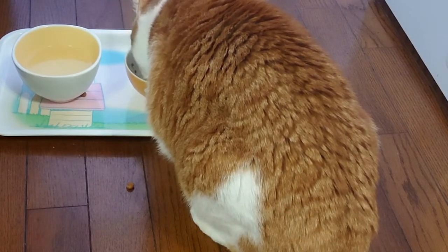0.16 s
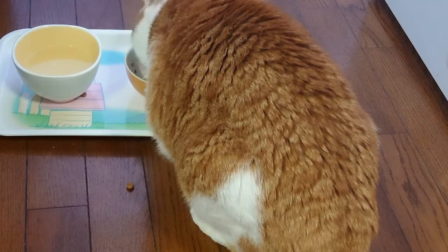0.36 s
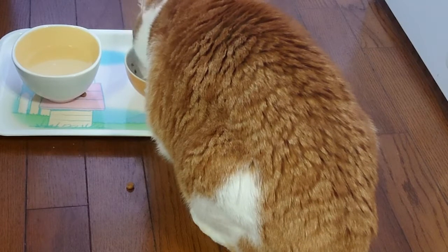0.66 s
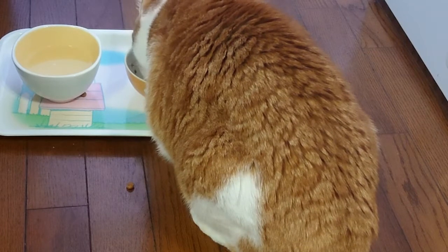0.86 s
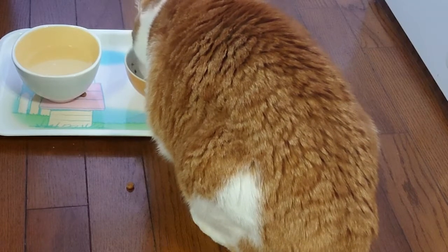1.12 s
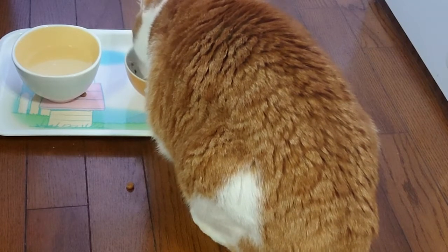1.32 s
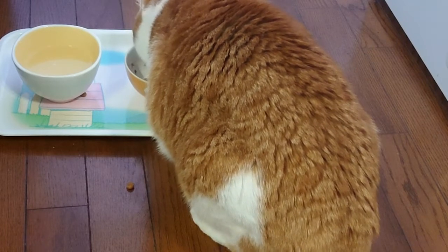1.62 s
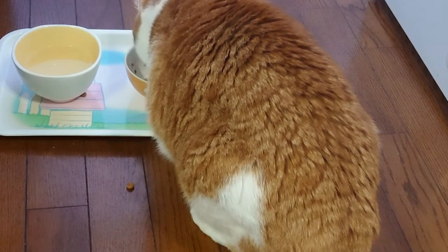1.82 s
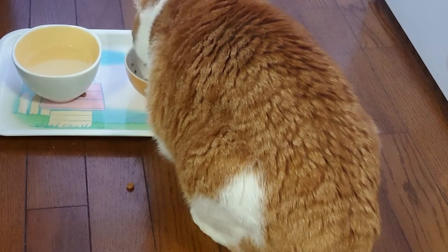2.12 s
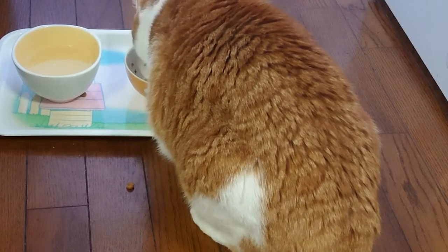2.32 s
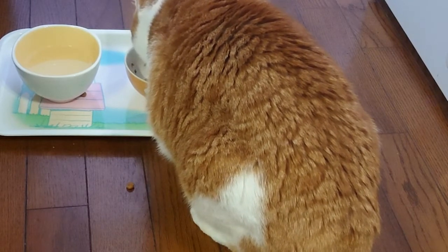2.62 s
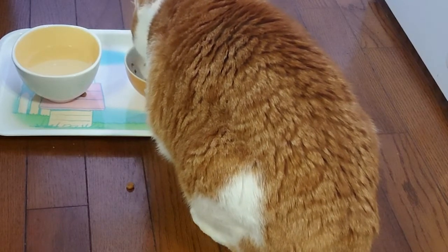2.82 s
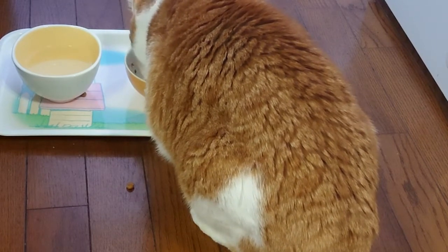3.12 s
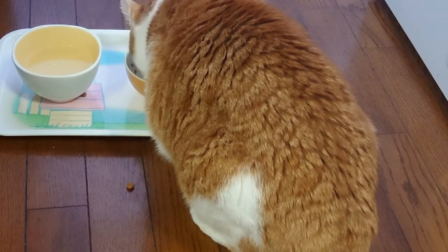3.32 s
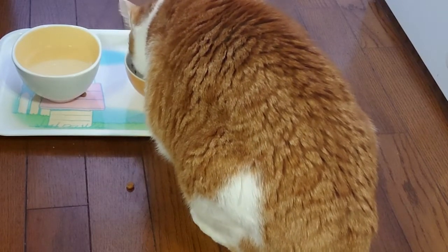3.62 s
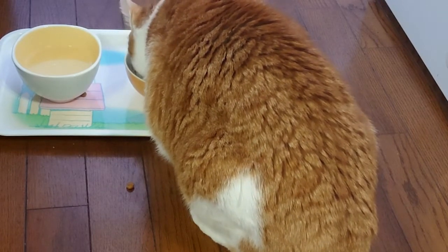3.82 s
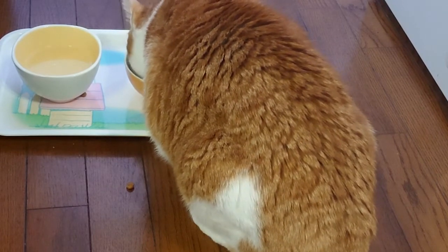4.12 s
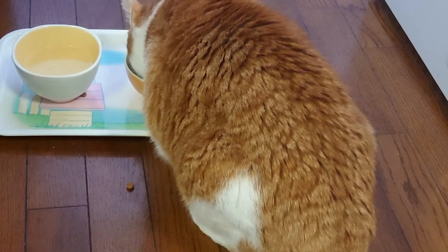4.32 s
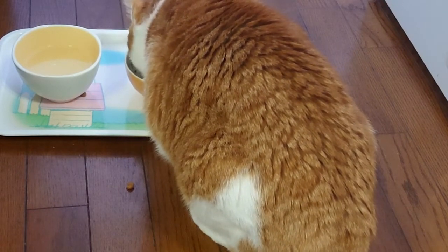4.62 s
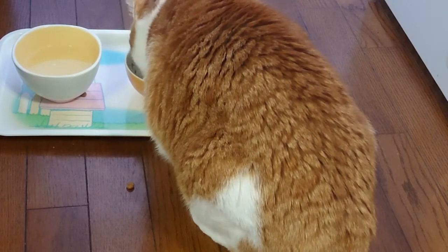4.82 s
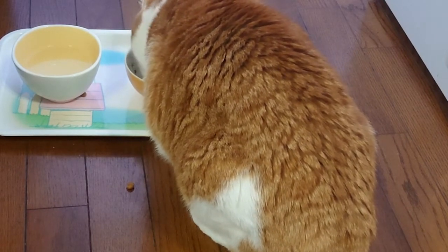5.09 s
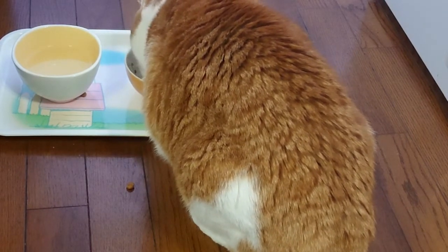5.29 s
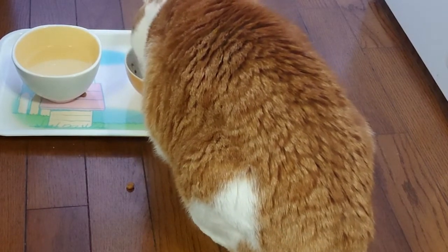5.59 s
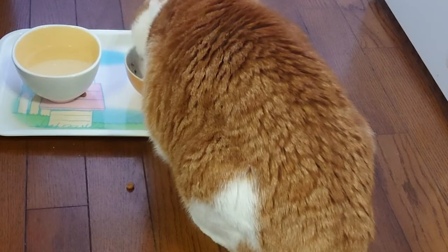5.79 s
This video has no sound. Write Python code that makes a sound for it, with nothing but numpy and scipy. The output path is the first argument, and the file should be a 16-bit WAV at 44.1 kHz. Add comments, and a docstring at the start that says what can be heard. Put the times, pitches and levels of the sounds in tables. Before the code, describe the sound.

A cat eats wet food from a bowl with smacks and soft bumps, until a door thuds shut across the room.

```python
"""A bare room with a wooden floor, where a cat eats wet minced food from a small bowl on a tray.
Wet films tear in its mouth as smacks and crackles; its tongue rubs the bowl and its muzzle bumps it.
Something like a door thuds shut nearby, with a latch click and a booming panel. The cat pauses and gives
one soft lick, while a scrape and a few hollow knocks come from across the room, over still air and hum."""
import sys
import numpy as np
from scipy import signal
from scipy.fft import rfft, irfft
from scipy.io import wavfile

SR = 44100
rng = np.random.default_rng(int(sys.argv[2]) if len(sys.argv) > 2 else 0)


def put_to_file(sound):
    """Save the sound as 16-bit audio at rate SR, in the file named by the first command-line argument."""
    columns = np.atleast_2d(sound).T  # one column per channel
    safe = np.clip(columns, -1, 1)
    whole_steps = np.round(safe * 32767)
    wavfile.write(sys.argv[1], SR, whole_steps.astype(np.int16))


N = 262395
TIME = np.arange(N) / SR

# tone of a wet pop inside the mouth: (frequency [Hz], level [dB])
MOUTH_SPECTRUM = [(150, -21), (700, -6), (1100, 2), (1550, 2.5), (1850, 3), (2700, 0.5), (3500, -3.5),
                  (5500, -16.5), (9000, -60)]
# bright snap of a tearing wet film: (frequency [Hz], level [dB])
SNAP_SPECTRUM = [(500, -33), (2400, -3.5), (3500, 2.5), (5000, -3.5), (6200, -7.5), (8000, -29),
                 (12000, -59.5)]


def from_db(db):
    """Decibels to amplitude."""
    return 10 ** (np.asarray(db) / 20)


def unit_energy(x):
    """Scale each channel to an energy of 1."""
    return x / np.sqrt(np.sum(x ** 2, axis=-1, keepdims=True) + 1e-20)


def unit_rms(x):
    """Scale each channel to an RMS of 1."""
    return unit_energy(x) * np.sqrt(x.shape[-1])


def at_hz(points, hz):
    """Read a table on a log-frequency axis."""
    knots, values = np.transpose(points)
    return np.interp(np.log(np.maximum(hz, 1)), np.log(knots), values)


def add(track, start_s, sound):
    """Mix a sound in at its cue."""
    start = int(start_s * SR)
    track[start:start + len(sound)] += sound[:N - start]


def colour(x, spectrum, size=4096):
    """Minimum-phase EQ: shapes the tone with no ringing ahead of an attack."""
    cepstrum = irfft(np.log(from_db(at_hz(spectrum, np.fft.rfftfreq(size, 1 / SR)))))
    cepstrum[1:size // 2] *= 2
    cepstrum[size // 2 + 1:] = 0
    return signal.fftconvolve(x, irfft(np.exp(rfft(cepstrum))))[:len(x)]


def resonance(x, hz, width_hz):
    """Two-pole resonance with a peak gain of 1."""
    radius = np.exp(-np.pi * width_hz / SR)
    feedback = [1, -2 * radius * np.cos(2 * np.pi * hz / SR), radius ** 2]
    return signal.lfilter(np.array([1, 0, -1]) * (1 - radius ** 2) / 2, feedback, x + 1e-18)


def ring(hz, t60):
    """One second of a struck mode."""
    t = TIME[:SR]
    return np.sin(2 * np.pi * hz * t) * from_db(-60 * t / t60)


def grains(per_s, spread_db, size=N):
    """Tiny clicks at random moments; the wider the spread, the more a few stand out."""
    heights = from_db(spread_db * np.minimum(rng.exponential(1, size), 4))
    return heights * rng.choice([-1, 1], size) * (rng.random(size) < per_s / SR)


def burst(decay_s, per_s, spread_db, first, size=4096):
    """A leading pop of height `first`, then a dying flurry of clicks."""
    pops = unit_energy(grains(per_s, spread_db, size) * np.exp(-TIME[:size] / decay_s))
    pops[0] += first
    return pops


def strokes(rows, attack_s, release_db_per_s, sag_db_per_s=0):
    """Envelope of rubbing strokes: each rises, holds or sags for its length, then dies away."""
    power = np.zeros(N)
    for start_s, length_s, db in rows:
        age = np.maximum(TIME - start_s, 0)
        rise = np.minimum(age / attack_s, 1)
        fall_db = sag_db_per_s * age + release_db_per_s * np.maximum(age - length_s, 0)
        power += (rise * from_db(db - np.minimum(fall_db, 120))) ** 2
    return np.sqrt(power)


def diffuse_bands(size, port_spacing_m=0.16):
    """Half-octave noise bands from all sides: the two microphone ports agree only at long wavelengths."""
    edges = 22 * 2 ** (np.arange(20) / 2)
    white = rng.standard_normal((2, 2, size))
    for k, (low, high) in enumerate(zip(edges, edges[1:])):
        bandpass = signal.butter(2, (low, high), "band", fs=SR, output="sos")
        mid, side = unit_rms(signal.sosfilt(bandpass, white[k % 2]))
        hz = np.sqrt(low * high)
        coherence = 0.85 * np.sinc(2 * hz * port_spacing_m / 343)
        pair = np.sqrt(1 + coherence) * mid + np.sqrt(1 - coherence) * side * [[1], [-1]]
        yield hz, pair * np.sqrt((high - low) / SR * 2)


def room(x, balance, direct_db, early_db, early_s, t60_scale, left_lag_s):
    """Direct sound, a dense cluster of echoes off floor and walls, then the reverberant tail."""
    # reverb time of the bare room: (frequency [Hz], t60 [s])
    decay_times = [(100, .4), (250, 0.29), (550, 0.48), (1400, 0.38), (3700, 0.33), (10000, 0.38),
                   (16000, 0.46)]
    t, response = TIME[:SR], 0
    early_lift = 1 + from_db(early_db) * np.exp(-t / early_s)
    build_up = 1 - np.exp(-t / 0.0014)
    for hz, pair in diffuse_bands(SR):
        tail = from_db(-60 * t / (t60_scale * at_hz(decay_times, hz)))
        pan = from_db(at_hz(balance, hz) * np.array([[.5], [-.5]]))
        response = response + unit_energy(pair * tail * early_lift * build_up) * pair.std() * pan
    response[0, int(left_lag_s * SR)] += from_db(direct_db)
    response[1, 0] += from_db(direct_db)
    response /= np.sqrt(np.sum(response ** 2) / 2)
    return signal.fftconvolve(x[None], response, axes=1)[:, :N]


def room_tone():
    """A bed of still air and an appliance's low hum."""
    # still air of the room: (frequency [Hz], level [dB])
    air_spectrum = [(15, -65), (25, -44.5), (41, -15), (64, -12.5), (111, -3.5), (195, -29.5), (229, -13.5),
                    (293, -22), (489, -23), (560, -23.5), (754, -33.5), (1260, -38), (4030, -35),
                    (6210, -59.5), (16000, -63.5)]
    # tones of the appliance: (frequency [Hz], level [dB])
    hum_tones = [(59.2, -63.5), (96.9, -79), (226, -77.5)]
    air = unit_rms(sum(from_db(at_hz(air_spectrum, hz)) * pair for hz, pair in diffuse_bands(N)))
    hum = sum(from_db(db) * np.sqrt(2) * np.sin(2 * np.pi * (hz * TIME + rng.random()))
              for hz, db in hum_tones)
    return from_db(-63) * air + hum


def floor_scrape():
    """Something slides over the floor in three coarse slips."""
    # slips along the floor: (start [s], length [s], level [dB])
    slips = [(4.83, 0.0076, -45), (4.85, 0.008, -42), (4.9, 0.01, -43)]
    # tone of the scrape: (frequency [Hz], level [dB])
    scrape_spectrum = [(60, -23), (240, -14), (350, -7), (510, -4.5), (660, -2.5), (800, -7.5),
                       (2500, -15.5), (5000, -39.5), (9000, -64)]
    friction = unit_rms(colour(grains(per_s=1700, spread_db=4.5), scrape_spectrum))
    return strokes(slips, attack_s=0.0086, release_db_per_s=332) * friction


def hollow_knocks():
    """Soft blows, each with one hollow note: returns the notes and the faint clicks of contact."""
    # the blows and their notes: (time [s], level [dB], pitch [Hz], t60 [s])
    knocks = [(4.861, -42.5, 246.3, 0.13), (5.706, -51, 469, 0.29), (5.75, -45.5, 423, 0.092),
              (5.772, -52, 523, 0.15), (5.797, -51, 366.3, 0.32), (5.821, -55.5, 357, 0.16),
              (5.922, -56.5, 378, 0.18)]
    # dull click of contact: (frequency [Hz], level [dB])
    click_spectrum = [(100, -27), (400, 3.5), (700, 0), (1200, -21.5), (2200, -10.5), (4500, -20.5),
                      (8000, -49.5)]
    notes, clicks = np.zeros(N), np.zeros(N)
    for s, db, hz, t60 in knocks:
        contact = burst(.008, per_s=1500, spread_db=3, first=1)
        add(notes, s, from_db(db) * ring(hz, t60))
        add(clicks, s, from_db(db + 20) * unit_energy(colour(contact, click_spectrum)))
    return notes, clicks


def door():
    """The latch clicks, the panel slams and rebounds: returns its low boom and its sharp crack."""
    # blows of the door, latch first: (time [s], thump level [dB], crack level [dB])
    blows = [(4.4444, -50, -26), (4.485, -19.5, -6), (4.4886, -28.5, 9.5), (4.4931, -16.5, -3),
             (4.5050, -24.5, -3), (4.5281, -32.5, -3.5)]
    # modes of the door panel and the floor: (frequency [Hz], level [dB], t60 [s])
    panel_modes = [(66, -2.5, 0.51), (87.6, 1, 0.11), (110, -8, 0.036), (146.2, -18, 0.13),
                   (246.7, -15, 0.18), (295, -11, 0.27), (412, -15.5, 0.32), (511.6, -25, 0.28),
                   (653, -31, 0.2)]
    # crack of the impact: (frequency [Hz], level [dB])
    crack_spectrum = [(88, -21.5), (150, -7), (289, -11), (324, -9.5), (401, -9), (468, -12.5),
                      (649, -14.5), (714, -16.5), (1010, -19), (1300, -19.5), (2230, -18), (5510, -28.5),
                      (7350, -56.5), (9450, -50), (15000, -64.5)]
    boom, crack = np.zeros(N), np.zeros(N)
    panel = sum(from_db(db) * ring(hz, t60) for hz, db, t60 in panel_modes)
    for s, thump_db, crack_db in blows:
        contact = burst(.002, per_s=9000, spread_db=2, first=1.2)
        add(boom, s, from_db(thump_db) * panel)
        add(crack, s, from_db(crack_db) * unit_energy(colour(contact, crack_spectrum)))
    return boom, crack


def bowl(force):
    """The bowl and tray answer a soft push with their damped resonances."""
    # resonances of the bowl on its tray: (frequency [Hz], width [Hz], level [dB])
    modes = [(223, 119, -6), (336, 45.3, 0), (429.4, 73, -1), (632, 102, -6), (867, 236, -9.5)]
    push = signal.sosfilt(signal.butter(2, 1100, fs=SR, output="sos"), force)
    return sum((-1) ** k * from_db(db) * resonance(push, hz, width)
               for k, (hz, width, db) in enumerate(modes))


def tray_shoves():
    """Now and then the tray shifts along the boards with a short, low rumble."""
    # shoves of the tray: (start [s], length [s], level [dB])
    shoves = [(2.995, 0.021, -46.5), (3.425, 0.032, -46), (3.56, .035, -44), (3.69, 0.061, -47.5)]
    # rumble of the tray on wood: (frequency [Hz], level [dB])
    rumble_spectrum = [(40, -27.5), (70, 8.5), (105, 12), (170, 13), (260, -37), (600, -59), (3000, -98)]
    rumble = unit_rms(colour(grains(per_s=460, spread_db=7.5), rumble_spectrum))
    return strokes(shoves, attack_s=0.014, release_db_per_s=200) * rumble


def tongue_slips(pocket_hz=1420, pocket_width_hz=300):
    """A quick slip of the tongue squeaks in a narrow pocket of air; much finer ones swish."""
    # soft swishes of the tongue: (start [s], length [s], level [dB])
    swishes = [(5.06, 0.34, -72), (5.172, 0.078, -57)]
    # airy tone of a swish: (frequency [Hz], level [dB])
    swish_spectrum = [(1200, -18), (2100, -6), (2600, 11), (3100, -3.5), (4400, -2), (5500, -5),
                      (7000, -29), (15000, -28)]
    squeaks = [(1.141, 0.014, -39)]   # (start [s], length [s], level [dB])
    pocket = resonance(grains(per_s=3500, spread_db=5), pocket_hz, pocket_width_hz)
    squeak = unit_rms(resonance(pocket, pocket_hz, pocket_width_hz))
    swish = unit_rms(colour(grains(per_s=6400, spread_db=4.5), swish_spectrum))
    return (strokes(squeaks, attack_s=0.007, release_db_per_s=1700) * squeak
            + strokes(swishes, attack_s=0.0097, release_db_per_s=380) * swish)


def licking():
    """With each mouthful the rough tongue rubs the bowl and moist food crackles."""
    # the tongue works in the food: (start [s], length [s], level [dB])
    mouthfuls = [(0.258, 0.19, -53.5), (0.88, 0.17, -57.5), (1.29, 0.12, -55), (1.87, .13, -66),
                 (2.08, 0.085, -55.5), (2.45, 0.11, -70), (2.85, 0.25, -52), (3.42, 0.072, -51),
                 (3.56, 0.27, -49.5)]
    chewing = [(0.29, 3.98, -66.5)]   # same columns; goes on quietly between mouthfuls
    shape = dict(attack_s=0.023, release_db_per_s=152)
    effort = np.hypot(strokes(chewing, **shape), strokes(mouthfuls, **shape, sag_db_per_s=9.5))
    crackle = grains(per_s=700, spread_db=0)
    wet = unit_rms(colour(crackle, MOUTH_SPECTRUM))
    wet += from_db(-11) * unit_rms(colour(crackle, SNAP_SPECTRUM))
    rub = unit_rms(bowl(grains(per_s=700, spread_db=2.5)))
    return effort * (from_db(-3.5) * rub + from_db(-7.5) * wet)


def mouth_cues():
    """Smacks and bumps in time order; sharper ones snap harder, spray more and ring the mouth higher."""
    # wet smacks: (time [s], mouth level [dB], bowl knock level [dB], sharpness as snap over mouth [dB])
    wet_smacks = [(0.315, -18.5, -21, -5.5), (0.674, -13, -24, -2), (0.823, -29.5, -30, -4.5),
                  (1.026, -12, -16.5, -6.5), (1.132, -19, -21.5, -8.5), (1.248, -13.5, -18.5, -2.5),
                  (1.268, -15, -18.5, -0.5), (1.6514, -18, -29, -2.5), (2.147, -15, -23, -7),
                  (2.173, -14, -26, 0.5), (2.4437, -18.5, -28.5, -5.5), (2.486, -20, -31, -8),
                  (2.5204, -7.5, -19.5, -1.5), (2.747, -20, -18, -4.5), (2.8328, -16, -22, -1.5),
                  (2.979, -9, -15, -11), (3.133, -19.5, -20, -8), (3.2, -13.5, -21, -7),
                  (3.281, -22.5, -25.5, -12.5), (3.423, -19.5, -13, -5), (3.4361, -11, -9.5, -4.5),
                  (3.64, -16, -25, -4.5), (5.304, -38, -42, 3.5)]
    # the muzzle bumps the bowl: (time [s], knock level [dB])
    muzzle_bumps = [(0.26, -21), (0.476, -21.5), (0.5821, -16.5), (0.887, -20.5), (0.908, -22.5),
                    (0.984, -23), (1.05, -16), (1.07, -21), (1.353, -14), (1.382, -24), (1.477, -19),
                    (1.87, -29), (1.951, -25.5), (2.047, -22), (2.067, -18.5), (2.103, -12), (2.362, -28.5),
                    (2.463, -21.5), (2.932, -25.5), (3.019, -17), (3.071, -17), (3.456, -14), (3.57, -15.5),
                    (3.617, -21), (3.697, -17), (3.715, -13.5), (3.755, -20.5), (3.794, -15)]
    bumps = [(s, db - 3.5, db, -13) for s, db in muzzle_bumps]   # each brings a weak, dull smack
    times, mouth_db, knock_db, sharp_db = np.transpose(sorted(wet_smacks + bumps))
    snap_db = mouth_db + sharp_db
    spit_db = mouth_db - 8 + 2 * sharp_db
    octaves = 0.06 * sharp_db + 0.099 * rng.standard_normal(len(times))
    cavity_hz = 2140 * 2 ** octaves
    return np.transpose([times, mouth_db, knock_db, snap_db, spit_db, cavity_hz])


def smacks(cues):
    """A wet film tears: the burst rings the mouth cavity, snaps brightly, sprays and knocks the bowl."""
    # fine spray of spit: (frequency [Hz], level [dB])
    spit_spectrum = [(2000, -59), (7000, -18), (9500, -6), (16000, -7.5)]
    track = np.zeros(N)
    for s, mouth_db, knock_db, snap_db, spit_db, cavity_hz in cues:
        tear = burst(0.0025, per_s=2600, spread_db=3, first=0.53)
        crumble = burst(0.028, per_s=900, spread_db=8.5, first=0)
        pops = tear + from_db(-16.5) * crumble
        cavity = unit_energy(resonance(pops, cavity_hz, width_hz=235))
        mouth = unit_energy(colour(pops, MOUTH_SPECTRUM)) + from_db(-7.5) * cavity
        snap, spit = colour(pops, SNAP_SPECTRUM), colour(pops, spit_spectrum)
        knock = bowl(burst(0.0071, per_s=1100, spread_db=1.5, first=1.3))
        layers = unit_energy(np.array([mouth, knock, snap, spit]))
        add(track, s, from_db([mouth_db, knock_db, snap_db, spit_db]) @ layers)
    return track


def cat(echo_paths=4):
    """The head bobs about, so successive smacks reach the microphone by different echo paths."""
    # stereo lean of the cat's echoes: (frequency [Hz], left minus right [dB])
    balance = [(200, -1), (400, -1), (700, -6.5), (1300, 4), (2400, 4.5), (4400, 2.5), (15000, 3.5)]
    cues = mouth_cues()
    parts = [smacks(cues[k::echo_paths]) for k in range(echo_paths)]
    parts.append(licking() + tray_shoves() + tongue_slips())
    return sum(room(part, balance, direct_db=-2.5, early_db=3, early_s=0.0024,
                    t60_scale=0.88, left_lag_s=0.00042) for part in parts)


def scene():
    """The cat is close, on the floor; door, scrape and knocks come from across the room."""
    # stereo lean of the echoes from the door's side: (frequency [Hz], left minus right [dB])
    far_balance = [(200, 1), (500, -3), (1000, -4), (2000, 8), (4000, 4.5), (12000, 0.5)]
    boom, crack = door()
    notes, clicks = hollow_knocks()
    reverb_send = crack + floor_scrape() + clicks + from_db(-14) * boom + from_db(1.5) * notes
    far = room(reverb_send, far_balance, direct_db=-15.5, early_db=11, early_s=0.0036,
               t60_scale=0.99, left_lag_s=0.0002)
    body = (boom + notes) * from_db([[-.7], [.7]])   # no reverb, a touch to the right
    return cat() + far + body + room_tone()


def record(dry):
    """The microphone ports colour the treble; the deepest bass and the very top are cut."""
    # response of the ports: (frequency [Hz], gain [dB])
    port_response = [(5800, 0.5), (6700, -2.5), (7700, -9), (8600, -2), (9700, 0.5), (11300, -2.5),
                     (13000, -17), (15400, -6.5)]
    low_cut = signal.butter(4, 42, "high", fs=SR, output="sos")
    high_cut = signal.ellip(10, .3, 70, 15900, fs=SR, output="sos")
    coloured = np.array([colour(channel, port_response) for channel in dry])
    return signal.sosfilt(high_cut, signal.sosfilt(low_cut, coloured))


dry = scene()
out = record(dry)
put_to_file(out)
```